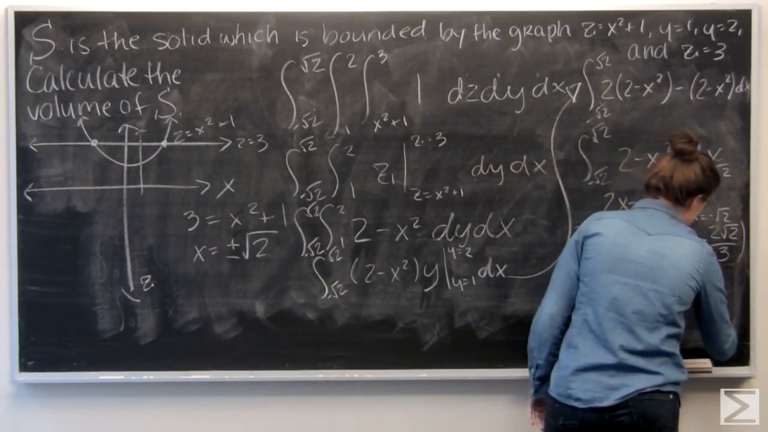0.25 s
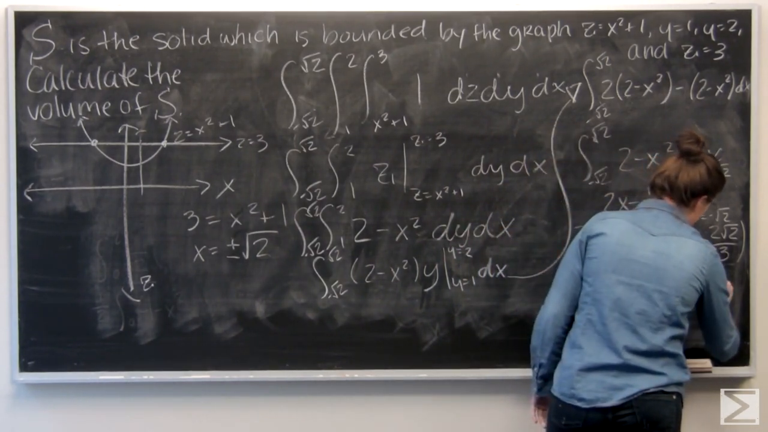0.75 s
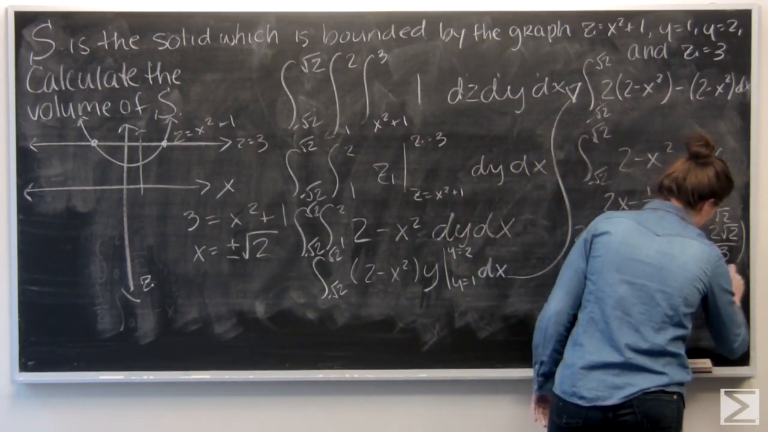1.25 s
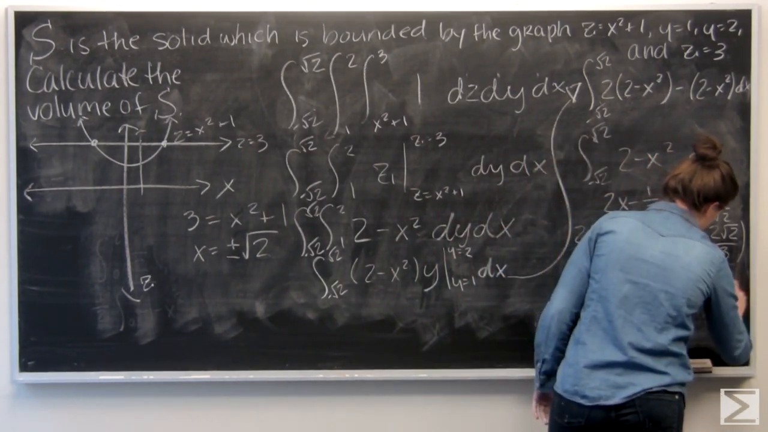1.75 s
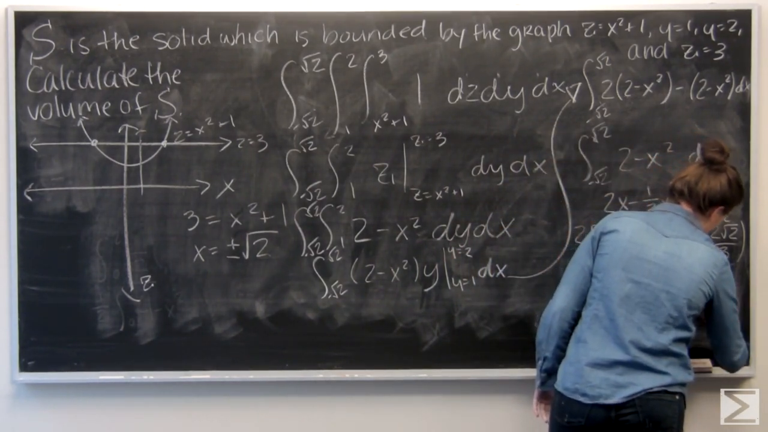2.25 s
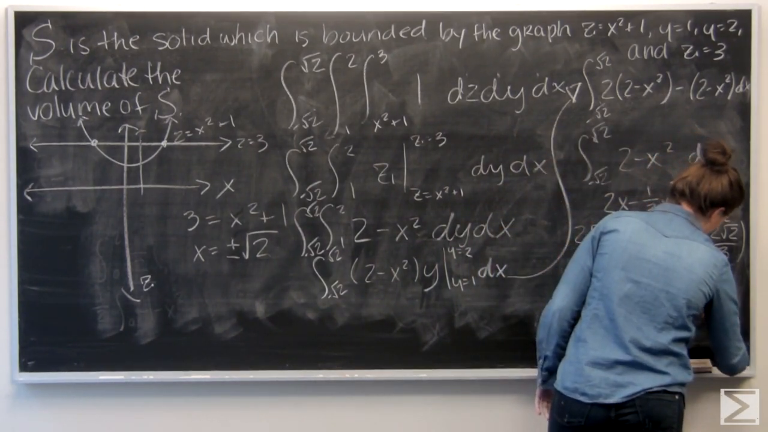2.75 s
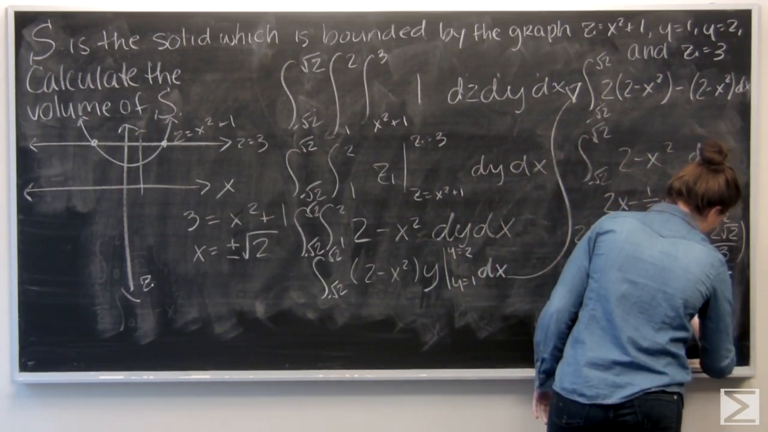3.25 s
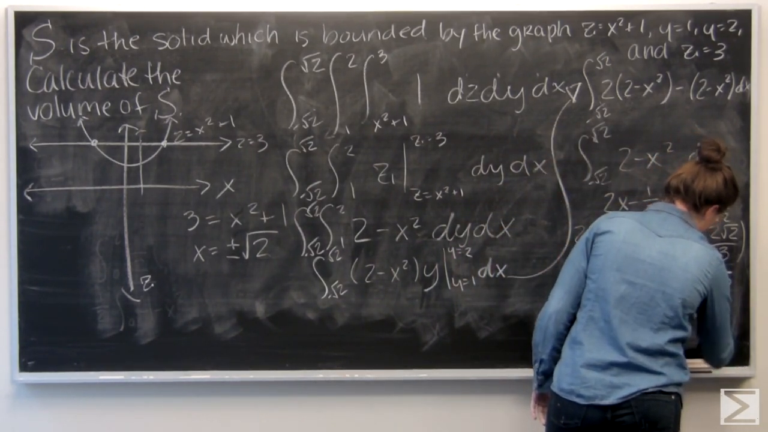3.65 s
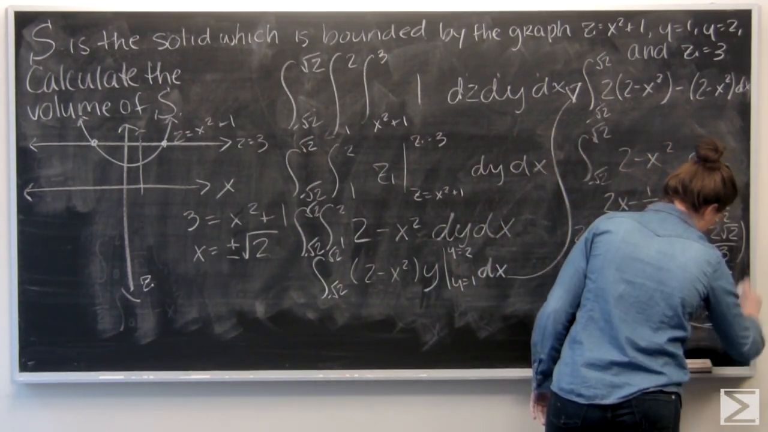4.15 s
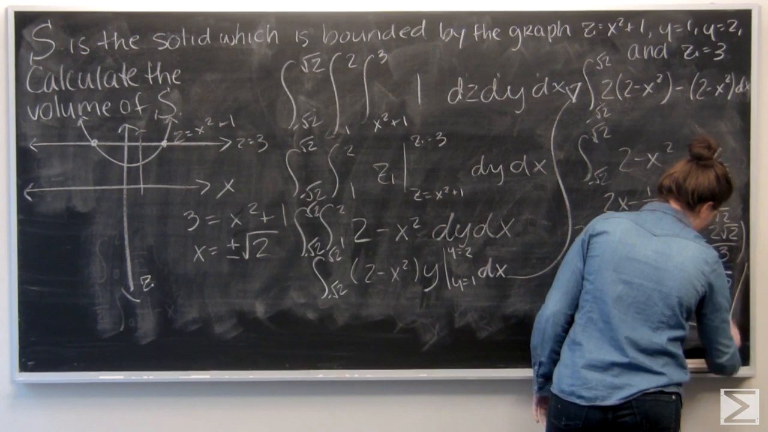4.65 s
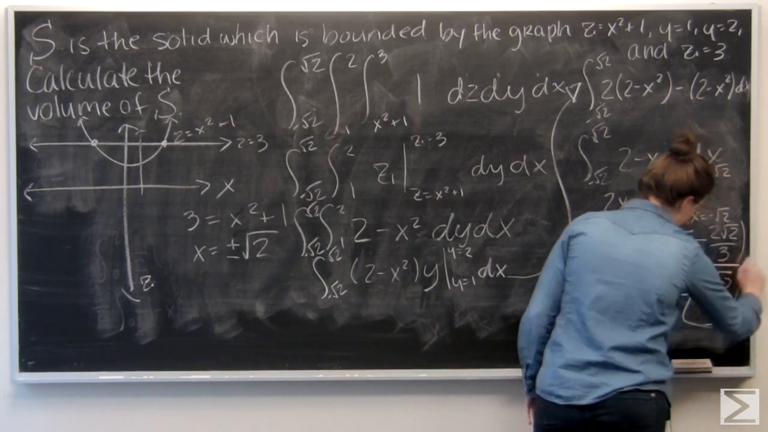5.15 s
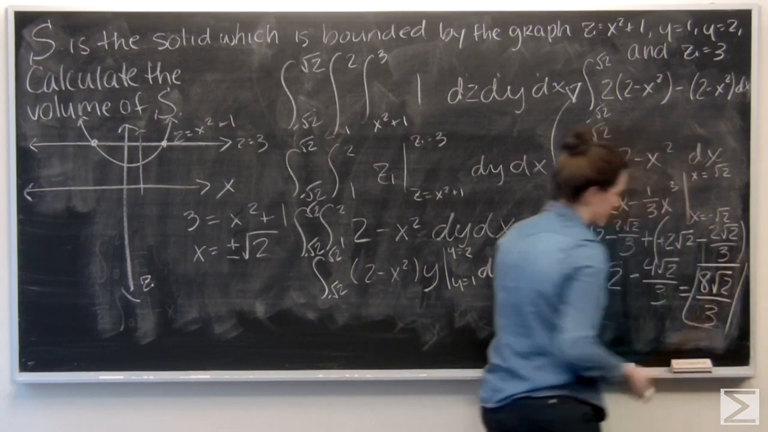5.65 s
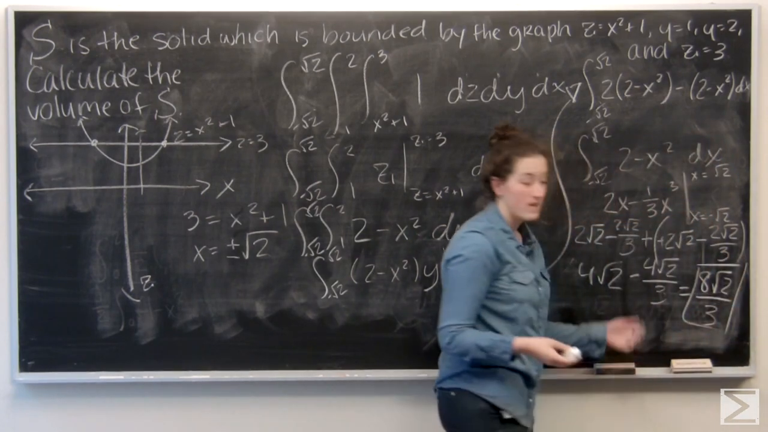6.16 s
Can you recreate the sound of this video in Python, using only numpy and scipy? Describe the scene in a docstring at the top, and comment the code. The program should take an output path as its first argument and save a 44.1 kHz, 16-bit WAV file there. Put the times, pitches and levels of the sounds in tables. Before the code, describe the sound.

Hollow chalk taps and gritty scratches on a wall board over faint ventilation, longer strokes stuttering, ending with faint movement and a tiny click.

```python
"""Chalk writes a few figures on a wall-mounted blackboard in a quiet classroom, then draws a box round them.
From the start, ventilation murmurs and hums; knocks of damped panel modes lead into dry scrapes of filtered
grain clicks, which swell with hand speed and ring the chalk stick near 5 kHz. A dull click falls early on.
At the ends of long lines the chalk stutters in short panel bursts. Then cloth slides and brushes as filtered
noise, soft low thuds follow as the writer steps away, and one small click, in two parts, comes last."""
import sys
import numpy as np
from scipy import signal
from scipy.fft import rfft, irfft, next_fast_len
from scipy.io import wavfile
from scipy.ndimage import map_coordinates

SR = 44100
rng = np.random.default_rng(int(sys.argv[2]) if len(sys.argv) > 2 else 0)


def waveform_to_disk(signal):
    """Save audio, clipped to [-1, 1], as 16-bit WAV at the path in sys.argv[1]."""
    frames = np.transpose(np.atleast_2d(signal))
    scaled = np.clip(frames, -1, 1) * 32767
    samples = np.round(scaled).astype(np.int16)
    wavfile.write(sys.argv[1], SR, samples)


N = 282416  # length in samples


def gain_of(db):
    """Decibels to amplitude."""
    return 10 ** (np.asarray(db) / 20)


def evened(x):
    """Scales a signal to rms 1."""
    return x / np.sqrt(np.mean(x ** 2) + 1e-20)


def read(points, hz):
    """Joins (Hz, value) points by straight lines on a log-frequency axis."""
    point_hz, value = np.transpose(points)
    return np.interp(np.log(hz + 1), np.log(point_hz + 1), value)


def add(mix, start_s, sound):
    """Mixes a sound in at its start time, cut at the end of the mix."""
    part = mix[round(start_s * SR):][:len(sound)]
    part += sound[:len(part)]


def coloured(x, spectrum):
    """Filters a signal by a curve of (Hz, dB) points."""
    size = next_fast_len(len(x))
    gain = gain_of(read(spectrum, np.fft.rfftfreq(size, 1 / SR)))
    return irfft(rfft(x, size) * gain, size)[:len(x)]


def wobble(hz):
    """Smooth random motion of rms 1, with a Gaussian roll-off around hz."""
    size = next_fast_len(N)
    roll_off = np.exp(-(np.fft.rfftfreq(size, 1 / SR) / hz) ** 2)
    return evened(irfft(rfft(rng.standard_normal(size)) * roll_off, size)[:N])


def resonate(x, hz, width):
    """A resonance of peak gain 1 that follows the pitch curve hz; width is in Hz."""
    turn = np.exp(2j * np.pi * np.cumsum(hz) / SR)
    r = np.exp(-np.pi * width / SR)
    # shift the pitch down to zero, smooth, and shift back up
    return 2 * (turn * signal.lfilter([1 - r], [1, -r], x / turn)).real


def burst(hz, swell):
    """A heavily damped mode: its envelope peaks at the swell time in seconds, then is soon gone."""
    t = np.arange(SR // 10) / SR
    envelope = t / swell * np.exp((1 - (t / swell) ** 2) / 2)
    return -envelope * np.sin(2 * np.pi * hz * t)


def crunch(spectrum, rise, decay):
    """A short puff of coloured noise that swells and dies; rise and decay are time constants in seconds."""
    t = np.arange(SR // 5) / SR
    noise = evened(coloured(rng.standard_normal(len(t)), spectrum))
    return noise * (1 - np.exp(-t / rise)) * np.exp(-t / decay)


def grit(per_s, spread_db):
    """Grains breaking or catching: dense random clicks of uneven size, levelled to rms 1."""
    size = gain_of(spread_db * np.minimum(rng.exponential(1, N), 4))
    breaks = rng.random(N) < per_s / SR
    return evened(size * rng.standard_normal(N) * breaks)


def rippled(x, delays, share, sway):
    """Adds reflections (delays in s) whose paths shift by the share sway, sweeping ripples through the sound."""
    n = np.arange(N)
    reflections = 0
    for delay in delays:
        path = delay * SR * (1 + sway * wobble(hz=4))
        reflections = reflections + map_coordinates(x, [n - path], order=3)
    return x + share * reflections


# Ventilation rumble. Each row: frequency in Hz, relative density in dB per Hz.
AIR_SPECTRUM = [(20, -11.5), (45, -7.5), (75, -4.5), (150, -2), (280, -7), (400, -13), (650, -16),
                (900, -21.5), (1300, -26), (2000, -31), (3200, -34), (8000, -36), (15000, -40)]
# Faint noise, independent in each channel. Each row: frequency in Hz, relative density in dB per Hz.
CHANNEL_SPECTRUM = [(20, 14.5), (100, -2.5), (400, -5.5), (1200, -3.5), (4000, 1), (15000, 6.5)]


def air(rumble_db=-66.5, channel_db=-81):
    """Ventilation noise rumbles in the middle; each channel adds its own faint independent noise."""
    rumble = evened(coloured(rng.standard_normal(N), AIR_SPECTRUM))
    channel_noise = evened(np.array([coloured(rng.standard_normal(N), CHANNEL_SPECTRUM) for _ in range(2)]))
    return gain_of(rumble_db) * rumble + gain_of(channel_db) * channel_noise


# Mains hum of the ventilation. Each row: pitch in Hz, mean level in dB.
HUM_TONES = [(59.7, -74), (119.6, -77.5)]


def hum(waver_db=2):
    """The fan motor hums as faint sine tones, each wavering in level on its own."""
    t = np.arange(N) / SR
    out = np.zeros(N)
    for hz, db in HUM_TONES:
        tone = evened(np.sin(2 * np.pi * (hz * t + rng.random())))
        out += gain_of(db + waver_db * wobble(hz=2)) * tone
    return out


# Decay of the room. Each row: frequency in Hz, time in s to die by 60 dB apart from the early boost.
ROOM_DECAY = [(100, 0.87), (300, 0.3), (650, 0.52), (1500, 0.45), (4000, 0.21), (12000, 0.16)]
# Tone of the room. Each row: frequency in Hz, gain in dB.
ROOM_TONE = [(100, 2.5), (240, 10.5), (330, 4), (620, -7), (980, 2.5), (1600, 4), (4000, 2), (12000, 3)]


def tail(start=.005, early_db=5, early_time=.025):
    """Sparse reflections of random sign, boosted at first, each band dying at its own speed."""
    slot = SR // 2000  # one reflection falls at random in each slot
    at = np.arange(round(start * SR), SR - slot, slot)
    train = np.zeros(SR)
    train[at + rng.integers(0, slot, len(at))] = rng.choice([-1, 1], len(at))
    hz, t, bands = signal.stft(train, SR, nperseg=256)
    decay_db = early_db * np.exp(-t / early_time) - 60 * t / read(ROOM_DECAY, hz)[:, None]
    tone_db = read(ROOM_TONE, hz)[:, None]
    out = signal.istft(bands * gain_of(decay_db + tone_db), SR, nperseg=256)[1]
    return out / np.linalg.norm(out)


# Single echoes from nearby surfaces. Each row: mean delay in s, level in dB.
NEAR_ECHOES = [(.0068, -16), (.0092, -18.5), (0.0107, -23.5), (0.0339, -29.5)]


def classroom(x, wet_db=-11, drift=.0005, count=4):
    """Single echoes drift in delay and diffuse tails crossfade, as the chalk moves over the board."""
    n = np.arange(N)
    echoes, wet = np.zeros((2, N))
    for delay, db in NEAR_ECHOES:
        path = (delay + drift * wobble(hz=.8)) * SR
        echoes += gain_of(db) * map_coordinates(x, [n - path], order=3)
    place = np.linspace(0, count - 1, N)
    for k in range(count):
        nearness = np.cos(np.pi / 2 * np.clip(place - k, -1, 1))
        wet += signal.fftconvolve(x * nearness, tail())[:N]
    return x + echoes + gain_of(wet_db) * wet


# Footfalls. Each row: start in seconds, level in dB, pitch in Hz.
STEP_THUDS = [(5.517, -44, 57.2), (5.553, -45.5, 59.8), (5.579, -52, 42.6), (5.615, -60.5, 55),
              (5.721, -65, 60.5), (5.818, -57.5, 57.6)]


def thuds(swell=0.0081):
    """Soft, low, heavily damped bursts as the writer turns and steps away."""
    out = np.zeros(N)
    for start_s, db, hz in STEP_THUDS:
        add(out, start_s, gain_of(db) * burst(hz, swell))
    return out


# Small clicks, the early one duller; the last two rows are the two parts of one click.
# Each row: start in seconds, crack level in dB, thump level in dB, upper edge in Hz.
SMALL_CLICKS = [(0.4111, -45, -45.5, 3180), (6.261, -60.5, -68, 9000), (6.265, -51.5, -59, 9000)]
# Crack of those clicks. Each row: frequency in Hz, relative density in dB per Hz.
CRACK_SPECTRUM = [(200, 2), (800, -11), (1250, 6), (1800, -5), (2800, -7), (4000, -16), (5500, -4.5),
                  (8000, -7), (11000, -9), (15000, -35)]


def clicks(thump_hz=270):
    """Each part of a click is a low-passed noise crack over a short damped thump."""
    out = np.zeros(N)
    for start_s, crack_db, thump_db, edge_hz in SMALL_CLICKS:
        low_pass = signal.butter(4, edge_hz, fs=SR)
        crack = signal.lfilter(*low_pass, crunch(CRACK_SPECTRUM, rise=0.00037, decay=0.0032))
        add(out, start_s, gain_of(crack_db) * crack)
        add(out, start_s, gain_of(thump_db) * burst(thump_hz, swell=0.0032))
    return out


# Sliding cloth. Each row: frequency in Hz, relative density in dB per Hz.
CLOTH_SPECTRUM = [(100, -18), (400, -7), (700, 5), (1300, -2.5), (2100, -5), (2900, -8.5), (3800, -11),
                  (6000, -11.5), (8000, -18.5), (14000, -22.5)]


def shirt(start_s=5.19, rise_s=0.041, hold_s=0.98, fall_s=.15, start_db=-74.5, fade_db_per_s=5, flutter_db=1.0):
    """Cloth slides faintly, as coloured grains, while the arm comes down and the writer turns from the board."""
    t = np.maximum(np.arange(N) / SR - start_s, 0)
    swish = np.interp(t, np.cumsum([0, rise_s, hold_s, fall_s]), [0, 1, 1, 0])
    level_db = start_db - fade_db_per_s * t + flutter_db * wobble(hz=24.9)
    return swish * gain_of(level_db) * evened(coloured(grit(per_s=3100, spread_db=0.0), CLOTH_SPECTRUM))


def sleeve(start_s=5.23, length_s=0.25, peak_db=-81.5, centre_hz=3840, width_hz=1200):
    """The sleeve brushes the writer's side: noise through two equal resonances, under one soft arch."""
    arch = np.sin(np.pi * np.clip((np.arange(N) / SR - start_s) / length_s, 0, 1))
    hz = np.full(N, centre_hz)
    brush = resonate(resonate(rng.standard_normal(N), hz, width_hz), hz, width_hz)
    return gain_of(peak_db) * arch * evened(brush)


# Stutters at the end of a long line. Each row: start in seconds, level in dB, pitch in Hz.
STUTTERS = [(3.281, -54, 730), (4.606, -46.5, 865), (4.615, -46, 1050), (4.642, -41.5, 775),
            (4.656, -45, 656), (4.664, -46.5, 656)]


def skips(swell=0.0022):
    """The chalk stutters on the board in short damped bursts."""
    out = np.zeros(N)
    for start_s, db, hz in STUTTERS:
        add(out, start_s, gain_of(db) * burst(hz, swell))
    return out


# Chalk landings. Each row: start in seconds, level in dB, panel pitch in Hz, hardness in dB on the upper
# modes, weight in dB on the lower modes, level of the tip crunch in dB.
LANDINGS = [(0.0942, -13.5, 607, -20, -1.5, -53), (0.9407, -16, 638, -3, -4.5, -46),
            (1.6031, -16.5, 622, -1, 1.5, -48.5), (2.199, -11.5, 654, -15, 2.5, -55),
            (2.651, -18.5, 640, -19, 5, -55), (3.6217, -14.5, 612, -5, -1, -50.5),
            (4.3903, -30.5, 647, -15, 10.5, -54.5), (5.0126, -15, 588, -16.5, -2, -51.5)]
# Blackboard panel modes. Each row: multiple of the panel pitch, level in dB, swell time in s.
PANEL_MODES = [(.2, -23, 0.0032), (0.359, -21.5, .002), (1.002, -2, .0022), (1.519, -8.5, 0.0033),
               (1.92, -9.5, .0018), (2.599, -11.5, 0.0014), (3.6, -17, 0.00074), (4.8, -26, 0.00073)]
# Bending waves that linger in the panel. Each row: frequency in Hz, relative density in dB per Hz.
SHUDDER_SPECTRUM = [(30, -27), (60, -10.5), (125, 4.5), (225, 7.5), (330, -9.5), (600, 4), (1000, 6),
                    (1600, -8.5), (2200, -10.5), (3000, -16.5), (4000, -36), (7000, -48)]
# Crunch of the chalk tip. Each row: frequency in Hz, relative density in dB per Hz.
TIP_SPECTRUM = [(1500, -12), (3200, -1), (4200, 2), (5200, 7), (6500, -0.5), (9500, -12.5), (12000, -13.5),
                (15000, -27)]


def taps(shudder_db=-19, shudder_follow=0.52):
    """Panel modes knock and shudder on; hard landings favour upper modes, a heavy hand lower ones."""
    out = np.zeros(N)
    for start_s, db, hz, hard_db, weight_db, tip_db in LANDINGS:
        for ratio, mode_db, swell in PANEL_MODES:
            # each takes full effect half an octave from the panel pitch
            upper, lower = np.clip(2 * np.log2([ratio, 1 / ratio]), 0, 1)
            level_db = db + mode_db + upper * hard_db + lower * weight_db
            add(out, start_s, gain_of(level_db) * burst(hz * ratio, swell))
        shudder = crunch(SHUDDER_SPECTRUM, rise=0.00064, decay=0.015)
        add(out, start_s, gain_of(db + shudder_db + shudder_follow * hard_db) * shudder)
        add(out, start_s, gain_of(tip_db) * crunch(TIP_SPECTRUM, rise=0.00013, decay=0.0024))
    return out


# Sweeps of the hand. Each row: start in seconds, length in seconds, share of the length at which it is
# fastest, friction hiss in dB, stick ring at mid-length in dB, drag on the panel in dB, stick pitch at the
# start in Hz, stick pitch at the end in Hz. The three levels are for full speed.
HAND_SWEEPS = [ (0.087, 0.13, 0.14, -75.5, -70, -66.5, 5000, 5080),
               (0.197, 0.16, 0.45, -74, -74, -64.5, 5190, 4930),
               (0.321, 0.18, 0.4, -70, -73, -63.5, 5310, 5350),
               (0.46, 0.13, 0.42, -80.5, -71, -66.5, 5175, 5190),
               (0.551, 0.17, 0.62, -71.5, -69, -61.5, 4900, 5100),
               (0.938, 0.15, 0.24, -69.5, -68.5, -62.5, 5210, 5140),
               (1.09, 0.22, 0.57, -69.5, -73.5, -60.5, 5010, 4854),
               (1.259, 0.18, 0.5, -69, -68.5, -65.5, 5270, 5260),
               (1.609, 0.2, 0.26, -73.5, -72, -61, 5210, 5250), (1.747, .13, .5, -68, -76, -61, 5300, 5385),
               (1.858, 0.13, .45, -73, -68, -63, 5200, 5320),
               (2.211, 0.22, 0.68, -65, -59, -61, 4880, 5280),
               (2.662, 0.18, 0.55, -69.5, -65, -63.5, 4930, 5080),
               (2.818, .15, 0.66, -70, -67.5, -63.5, 5210, 4890),
               (2.989, 0.17, 0.7, -68, -65, -63.5, 4904, 5010),
               (3.112, 0.19, 0.7, -68.5, -68.5, -65, 5050, 4980),
               (3.487, 0.056, .45, -93.5, -76.5, -93, 5015, 4880),
               (3.623, 0.28, 0.51, -64, -62, -60.5, 4550, 5080),
               (3.869, 0.22, 0.82, -62, -58, -62.5, 4930, 5025),
               (4.399, 0.28, 0.78, -61.5, -67, -59.5, 5260, 5250),
               (5.014, .19, 0.85, -64.5, -67.5, -58, 5060, 5190)]


def sweeps(contact_s=0.0075, ring_fade_db=-6, ring_follow=.8, drag_follow=.35):
    """Each sweep speeds up and slows down; gives the gains of hiss, ring and drag, and the stick's pitch."""
    hiss, ring, drag, pitch, weight = np.zeros((5, N))
    for start_s, length, fastest, hiss_db, ring_db, drag_db, first_hz, last_hz in HAND_SWEEPS:
        t = np.arange(0, length, 1 / SR)
        progress = t / length
        speed = abs(np.sin(np.pi * np.interp(progress, [0, fastest, 1], [0, .5, 1])))
        touch = np.minimum(np.minimum(t, length - t) / contact_s, 1)  # the chalk bites and lifts
        faded_ring_db = ring_db + ring_fade_db * (progress - .5)  # rings most early in a sweep
        # overlapping sweeps add as power
        add(hiss, start_s, (touch * gain_of(hiss_db) * speed) ** 2)
        add(ring, start_s, (touch * gain_of(faded_ring_db) * speed ** ring_follow) ** 2)
        add(drag, start_s, (touch * gain_of(drag_db) * speed ** drag_follow) ** 2)
        add(pitch, start_s, speed * (first_hz + (last_hz - first_hz) * progress))
        add(weight, start_s, speed)
    down = np.flatnonzero(weight)
    stick_hz = np.interp(np.arange(N), down, pitch[down] / weight[down])
    return np.sqrt(hiss), np.sqrt(ring), np.sqrt(drag), stick_hz


# Modes of the chalk stick. Each row: multiple of the stick pitch, width in Hz of each of two resonances
# in series, level in dB.
STICK_MODES = [(1.001, 780, 2), (1.139, 1003, -9.5), (2.02, 2260, -15)]


def stick(hz):
    """Grains ring the modes of the chalk stick, whose pitch shifts with grip and angle."""
    grains = grit(per_s=20000, spread_db=-1.0)
    out = np.zeros(N)
    for ratio, width, db in STICK_MODES:
        mode = resonate(resonate(grains, ratio * hz, width), ratio * hz, width)
        out += gain_of(db) * evened(mode)
    return evened(out)


# Friction hiss at the tip. Each row: frequency in Hz, relative density in dB per Hz.
HISS_SPECTRUM = [(1000, -16), (2300, 9), (3000, 5.5), (3800, -0.5), (5000, 5), (6000, 5), (7500, -2),
                 (8800, -5.5), (10000, -3.5), (12000, -10.5), (13500, -16.5), (15000, -24)]
# Fine powder at speed. Each row: frequency in Hz, relative density in dB per Hz.
FIZZ_SPECTRUM = [(3000, -26.5), (6500, -4.5), (8500, 1), (11800, -4), (13300, -11.5), (15000, -22.5)]
# Panel under friction. Each row: frequency in Hz, relative density in dB per Hz.
DRAG_SPECTRUM = [(30, -30), (150, -1.5), (380, -6.5), (520, -5), (650, 5), (850, -0.5), (1150, -3),
                 (1700, -7), (2200, -17), (3500, -22.5), (6000, -32.5)]


def strokes(usual_db=-74, judder_db=0.27, pressure_db=1.5, fizz_db=-13, fizz_follow=1.45, wander_hz=69.8):
    """Grains hiss at the tip, ring the chalk stick and shake the panel while the chalk touches."""
    hiss_gain, ring_gain, drag_gain, stick_hz = sweeps()
    hiss = hiss_gain * evened(coloured(grit(per_s=24000, spread_db=2.5), HISS_SPECTRUM))
    ring = ring_gain * stick(stick_hz + wander_hz * wobble(hz=60))  # the grip is never quite steady
    # with speed the finest fizz grows faster than the hiss
    fizz_gain = gain_of(usual_db + fizz_db) * (hiss_gain / gain_of(usual_db)) ** fizz_follow
    fizz = fizz_gain * evened(coloured(rng.standard_normal(N), FIZZ_SPECTRUM))
    panel = drag_gain * evened(coloured(grit(per_s=2500, spread_db=0), DRAG_SPECTRUM))
    # the tip sound glances off hand and arm; bending waves return from the frame
    tip = rippled(hiss + fizz, (.0005, .0009, .0016, .0027), share=.36, sway=0.1502)
    panel = rippled(panel, (.0016, .0031), share=0.38, sway=0.2025)
    pressure = gain_of(pressure_db * wobble(hz=25))
    judder = gain_of(judder_db * wobble(hz=69.7))
    return (tip + (ring + panel) * pressure) * judder


def scene():
    """The writing and the writer's movements sound in the room, over ventilation, hum and faint channel noise."""
    movements = thuds() + clicks() + shirt() + sleeve()
    writing = skips() + taps() + strokes()
    return air() + hum() + classroom(movements + writing)


def record(dry, edge_hz=15250):
    """The recorder's upper band limit: a steep low-pass without phase shift."""
    low_pass = signal.firwin(511, edge_hz, window=("kaiser", 9), fs=SR)
    return signal.oaconvolve(dry, low_pass[None], "same")


dry = scene()
out = record(dry)
waveform_to_disk(out)
```